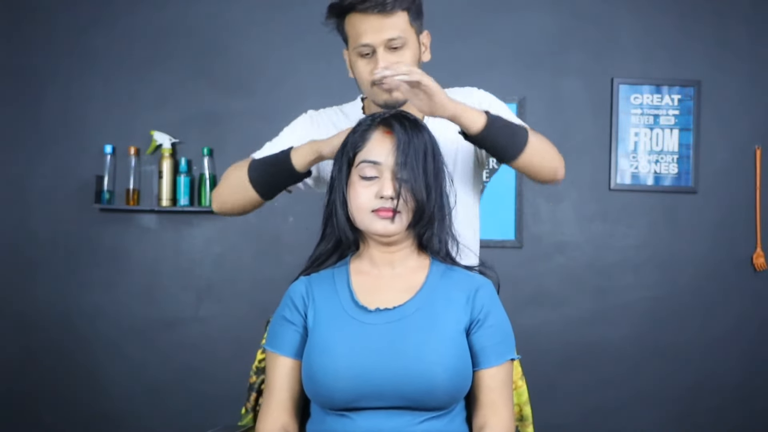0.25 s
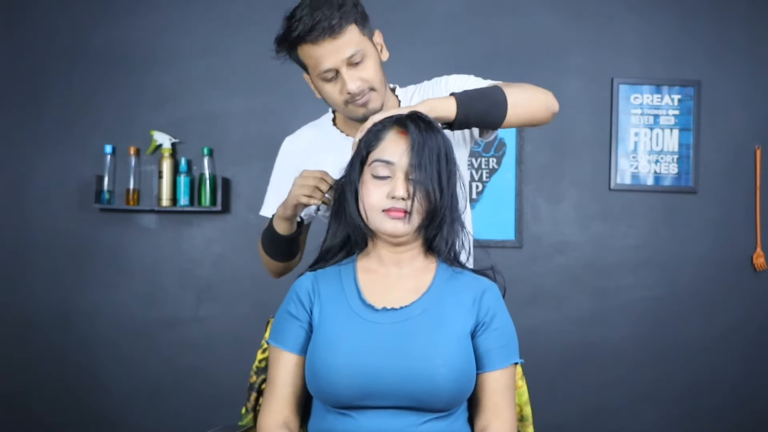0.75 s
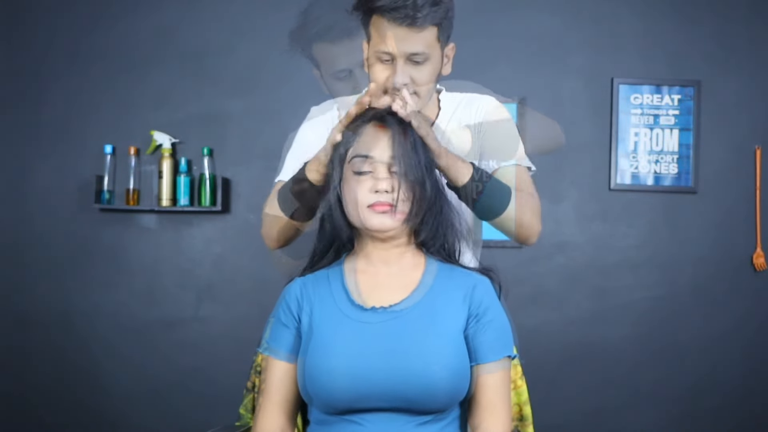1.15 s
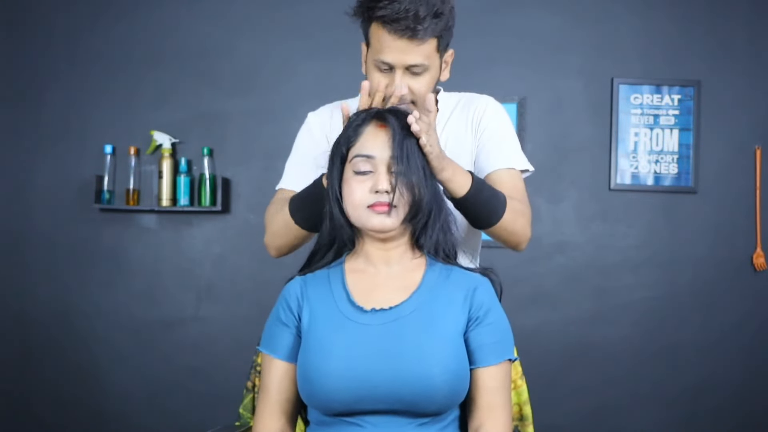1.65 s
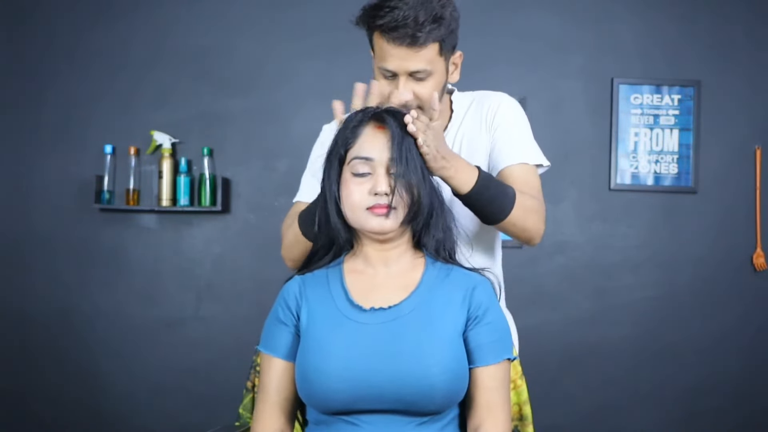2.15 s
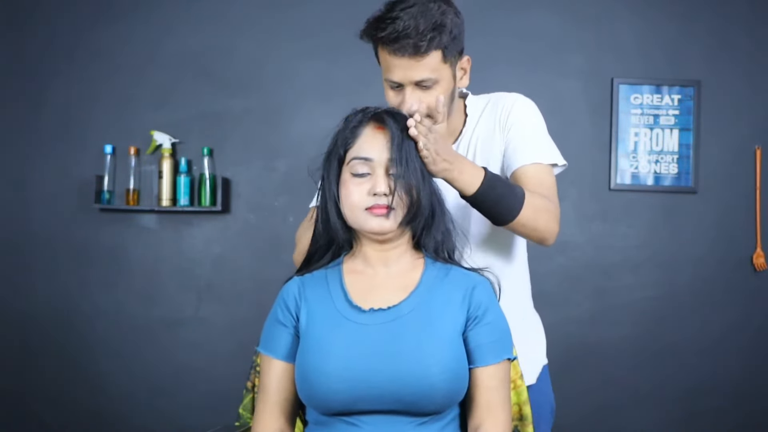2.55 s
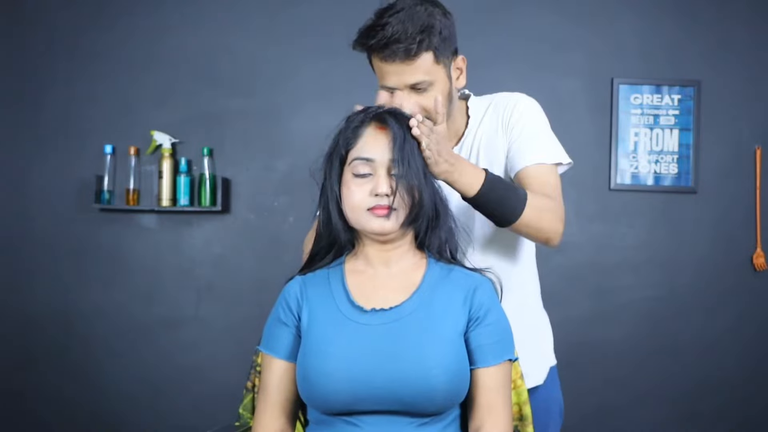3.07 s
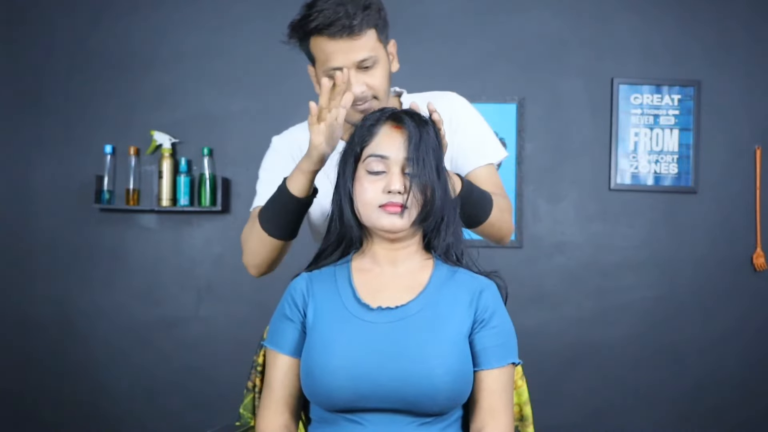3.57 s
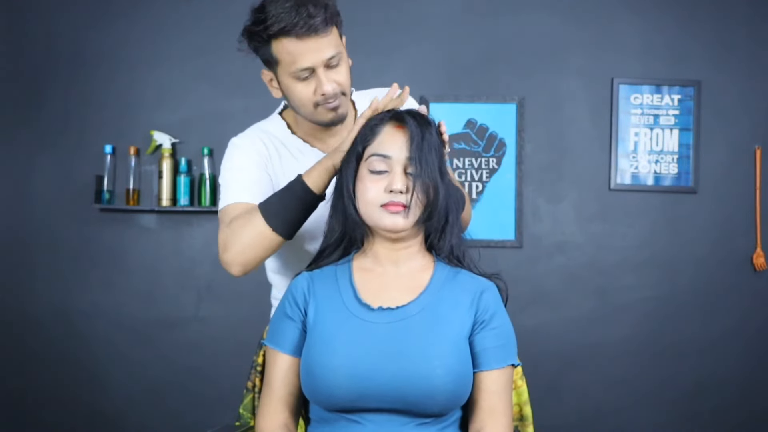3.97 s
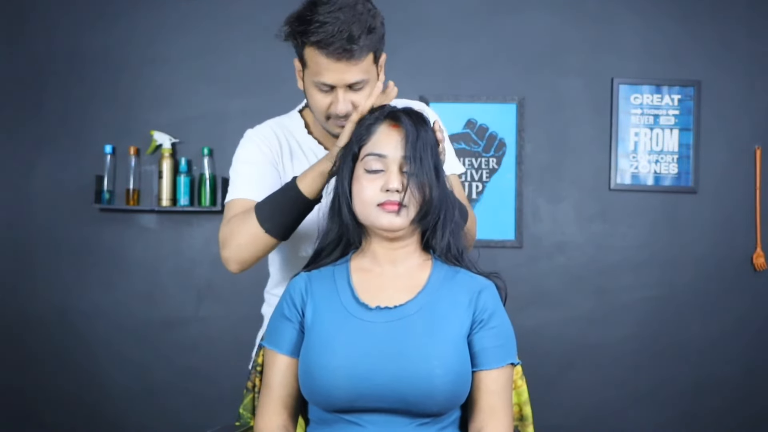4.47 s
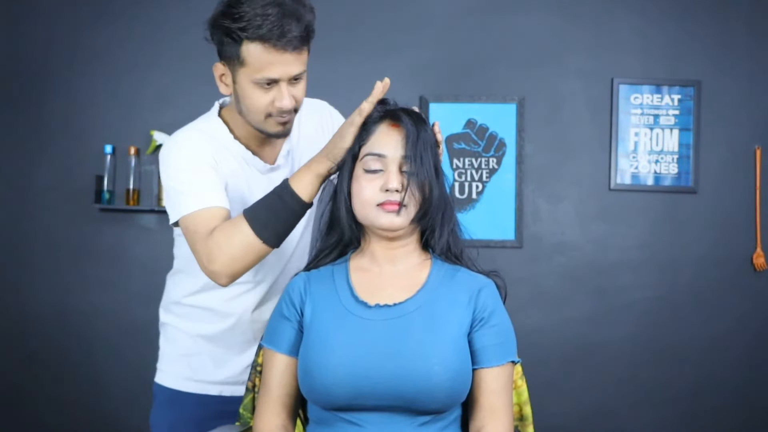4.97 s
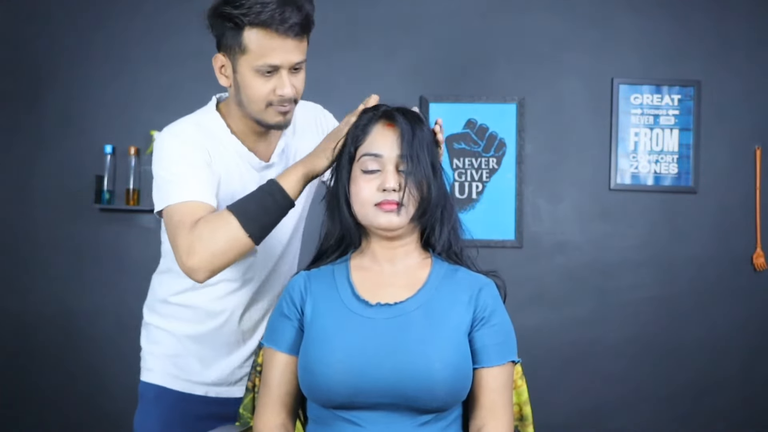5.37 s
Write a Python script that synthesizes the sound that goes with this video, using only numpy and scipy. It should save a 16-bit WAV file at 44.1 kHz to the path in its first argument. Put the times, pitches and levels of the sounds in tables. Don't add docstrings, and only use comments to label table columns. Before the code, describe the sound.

Close in-ear stereo of a hand rubbing long hair and scalp, about nine dry, scratchy strokes a second. It starts soft, shifting between ears, with a knuckle click before one second and a stronger one near 1.5. Rubbing grows louder, dull cable knocks thud around two seconds, then it pauses near 3.6 and resumes to the end. Distant traffic drones in a quiet room.

```python
import sys
import numpy as np
from scipy import signal
from scipy.fft import rfft, irfft, next_fast_len
from scipy.io import wavfile
from scipy.ndimage import uniform_filter1d

SR = 44100
rng = np.random.default_rng(int(sys.argv[2]) if len(sys.argv) > 2 else 0)


def boost(x):
    u = np.asarray(x, float) / 20
    return 10 ** u


def to_wav(s):
    ch = np.atleast_2d(s).T
    pcm = np.round(np.clip(ch, -1, 1) * 32767)
    wavfile.write(sys.argv[1], SR, pcm.astype(np.int16))


N = 247842


def read(points, hz):
    f, value = np.transpose(points)
    return np.interp(np.log(hz + 1), np.log(f + 1), value)[:, None]


def evened(x):
    return x / np.sqrt(np.mean(x ** 2) + 1e-20)


def pair(same, size, snaps_per_s=0.):
    snap_db = 3.5 + 2.5 * np.minimum(rng.exponential(1, (2, N)), 3)
    snaps = (rng.random((2, N)) < snaps_per_s / SR) * boost(snap_db)
    white = rng.standard_normal((2, N))
    grains = white + np.diff(np.sign(white) * snaps, prepend=0)
    hz, t, (a, b) = signal.stft(grains, SR, nperseg=size, noverlap=size * 3 // 4)
    likeness = np.clip(read(same, hz), -1, 1)
    return hz, t, np.array([a, likeness * a + np.sqrt(1 - likeness ** 2) * b])


def sound(z, size):
    return signal.istft(z, SR, nperseg=size, noverlap=size * 3 // 4)[1][:, :N]


def ears(pan_db):
    left = boost(pan_db) ** 2
    return np.sqrt(2 * np.array([left, np.ones_like(left)]) / (1 + left))


def strokes():
    # (time [s], treble left-right [dB], pressure [dB], extra pressure on a push [dB])
    hand = [(.05, -20, -6.5, 0.5), (.13, -29, -4.5, -5.5), (.2, -13, -2, -1), (.66, 61, -5.5, 1.5),
            (1.02, 30, -9.5, -6), (1.2, 1.5, -2, 1.5), (1.56, -4, 0, -2), (1.8, 7.5, -2.5, 3),
            (2.2, 24.5, -4.5, 3), (2.7, 23, -0.5, -1), (3.45, 18, -1.5, 0), (4.0, -2.5, -3, 9.5),
            (4.2, -2, -1.5, 2.5), (5.0, -0.5, 1.5, 4.5), (5.1, 5, -0.5, 3), (5.15, -17, -2.5, 23),
            (5.25, 4, 6.5, -7.5), (5.5, 3, 6, -2)]
    # (start [s], length [s], level [dB])
    pushes = [(.018, 0.07, -39.3), (.667, 0.059, -36), (1.756, 0.074, -27.5), (2.212, 0.056, -30),
              (2.672, 0.061, -30), (2.908, 0.05, -28), (3.365, 0.072, -27.5), (4.067, .075, -31.5),
              (4.526, 0.077, -34), (4.748, 0.077, -35), (4.985, 0.064, -35), (5.070, 0.08, -49)]
    # (start [s], length [s], level [dB])
    jolts = [(.107, 0.063, -38.5), (.159, 0.071, -46.5), (.870, 0.072, -38), (1.073, 0.12, -41.5),
             (1.313, 0.098, -33), (1.539, 0.074, -26), (1.981, .058, -27), (2.434, 0.049, -28.5),
             (3.134, 0.059, -29), (4.294, 0.075, -33.5), (5.321, 0.074, -36.5)]
    # (start [s], length [s], level [dB])
    pulls = [(-.03, 0.063, -51), (.690, 0.11, -56), (.775, 0.071, -37.5), (.980, 0.071, -39),
             (1.210, 0.096, -38), (1.441, 0.078, -31), (1.630, 0.098, -38), (1.862, 0.07, -38.5),
             (2.075, 0.073, -34.5), (2.309, .073, -37), (2.510, 0.1, -41), (2.765, 0.092, -38.5),
             (3.003, 0.074, -36.5), (3.233, 0.076, -34), (3.993, 0.045, -36), (4.185, .076, -33),
             (4.413, 0.073, -35), (4.647, .069, -36), (4.871, 0.076, -36), (5.123, 0.051, -43),
             (5.218, .072, -39), (5.434, 0.069, -40.5)]
    # (start [s], length [s], level [dB], left-right [dB], pressure [dB])
    sleeve = [
        (0.808, 0.15, -66, 16, 25),
        (3.467, 0.041, -55, 21, -1),
        (3.62, .14, -75.5, -6, 17),
        (3.871, 0.062, -56.5, -1, 2),
        (3.941, 0.11, -55, 1, 2),
        (5.33, 0.23, -69, 10, 33.5),
        (5.48, .1, -64, 0, 4),
    ]
    s, *hand_columns = np.transpose(hand)
    brushes = []
    for table, rise, pushing in ((pushes, 0.36, True), (jolts, 0.22, True), (pulls, 0.51, False)):
        for start, length, db in table:
            middle = start + length / 2
            pan_db, pressure_db, extra_db = (np.interp(middle, s, column) for column in hand_columns)
            brushes.append((start, length, db, rise, pan_db, pressure_db + pushing * extra_db))
    for start, length, db, pan_db, pressure_db in sleeve:
        brushes.append((start, length, db, 0.47, pan_db, pressure_db))
    return [(start + rise * length, db, rise * length, (1 - rise) * length, pan_db, pressure_db)
            for start, length, db, rise, pan_db, pressure_db in brushes]


def rubbing():
    # (frequency [Hz], density [dB per Hz])
    hair = [(250, -29), (600, -26.5), (900, -18), (1300, -7), (1800, -5.5), (2400, -1), (3700, 0),
            (5800, -.5), (7800, -3.5), (10500, -6.5), (13500, -12.5), (15500, -19)]
    # (frequency [Hz], share of the pressure [dB per dB])
    fullness = [(600, 2.24), (1300, 1.92), (1800, 1.5), (3200, 1.17), (5800, 0.46), (10500, -0.14),
                (15200, -0.9)]
    # (frequency [Hz], share of left-right [dB per dB])
    shadow = [(600, 0.1), (1300, 0.68), (2400, 0.36), (4300, 0.68), (7800, 0.8), (13500, 1.3)]
    # (frequency [Hz], left-right [dB])
    ear_fit = [(600, -7), (1300, -7), (2400, -5.5), (4300, -5), (7800, 1.1), (13500, -2.5)]
    # (frequency [Hz], likeness [-1 to 1])
    hair_same = [(300, 1), (1200, 0.43), (2500, 0.12), (5000, 0.033), (8000, 0.03)]
    room_db, room_t60 = -19.5, 0.31
    canal_width_hz = 300
    hz, t, z = pair(hair_same, size=256, snaps_per_s=350)
    band = (hz > 2500) & (hz < 14000)
    octaves = np.log2((hz[:, None] + 200) / 4500)
    power = np.zeros(z.shape)
    all_strokes = strokes()
    canals = 2070 * boost(1 * rng.standard_normal((len(all_strokes), 2)))
    for (s, db, rise, fall, pan_db, pressure_db), (peak_hz, next_hz) in zip(all_strokes, canals):
        near = abs(t - s) < .25
        lag = t[near] - s
        away = abs(lag) / np.where(lag < 0, rise, fall)
        speed_db = -10 * (0.33 * away + 0.61 * away ** np.where(lag < 0, 2.8, 3.07))
        colour = boost(read(hair, hz) + read(fullness, hz) * pressure_db)
        colour = colour / np.sqrt(np.sum(colour[band] ** 2) / len(hz))
        lopsided_s = fall - rise
        progress = np.clip(lag / (rise + fall), -.8, .8)
        travel_db = (-1.5 + 250 * lopsided_s) * progress
        sides = ears(read(shadow, hz) * (pan_db + travel_db) + read(ear_fit, hz))
        sweep_db = (1.5 - 210 * lopsided_s) * progress * octaves
        canal_hz = peak_hz + (next_hz - peak_hz) * np.clip(lag / fall, -1, 1)
        far_db = 0.33 * np.clip([-pan_db, pan_db], 0, 15)[:, None, None]
        ring_db = np.clip(3.0 + .5 * pressure_db, -2.5, 4.5) + far_db
        canal_db = ring_db * np.exp(-((hz[:, None] - canal_hz) / canal_width_hz) ** 2)
        power[:, :, near] += (sides * colour * boost(db + speed_db + 0.49 * sweep_db + canal_db)) ** 2
    keep = boost(-120 * (t[1] - t[0]) / room_t60)
    power += boost(room_db) ** 2 * signal.lfilter([1 - keep], [1, -keep], 1.9 * power + 0.067 * power[::-1])
    patches = rng.standard_normal(z.shape)
    tufts = evened(uniform_filter1d(uniform_filter1d(patches, size=4, axis=1), size=30, axis=2))
    jerks = evened(uniform_filter1d(patches.mean(axis=(0, 1)), size=3))
    return sound(z * np.sqrt(power) * boost(2.52 * tufts + 1.24 * jerks - 1.64), size=256)


def room_air():
    # (frequency [Hz], density [dB per Hz])
    air = [(25, -95), (55, -86.5), (100, -80.5), (160, -77.5), (210, -79), (320, -79), (420, -81.5),
           (520, -88.5), (750, -86.5), (1000, -92.5), (1500, -88.5), (2200, -97.5), (4000, -96),
           (8000, -101), (15000, -105)]
    # (frequency [Hz], likeness [-1 to 1])
    air_same = [(60, 1), (180, 0.93), (550, 0.54), (1650, -0.3), (4970, 0.029), (15000, -0.21)]
    # (frequency [Hz], left-right [dB])
    air_pan = [(60, 0.74), (240, -0.41), (950, -2.9), (3770, 0.0), (15000, 0.5)]
    # (time [s], level [dB])
    swell = [(0, 1.5), (1.2, -3), (2.15, 5), (2.6, 3), (3.72, 6.5), (3.9, 4), (5.5, 4.5)]
    hz, t, z = pair(air_same, size=4096)
    shape = boost(read(air, hz))
    shape = boost(-65) * shape / np.sqrt(np.mean(shape ** 2))
    low = np.exp(-np.log((hz[:, None] + 1) / 400) ** 2 / 2.7)
    wash = boost(low * np.interp(t, *np.transpose(swell)))
    return sound(z * shape * wash * ears(read(air_pan, hz)), size=4096)


def drones():
    # (start [s], end [s], first pitch [Hz], last pitch [Hz], level [dB])
    engines = [(-.2, 1.4, 164, 153, -71), (5.25, 5.9, 163, 156, -65), (2.45, 3.1, 228, 246, -69),
               (2.95, 3.75, 245, 240, -65), (3.95, 4.5, 240, 246, -66), (4.5, 5.5, 224, 247, -66),
               (3.3, 4.25, 285, 292, -69), (4.35, 5.0, 274, 291, -68), (5.35, 5.9, 276, 282, -66),
               (-.2, .6, 348, 342, -70), (3.3, 3.85, 345, 348, -70), (4.0, 4.55, 332, 352, -70),
               (4.75, 5.15, 337, 352, -69)]
    fade_s, wander_hz = .12, 1.2
    t = np.arange(N) / SR
    knots = np.linspace(0, N / SR, 60)
    out = np.zeros(N)
    for start, end, first_hz, last_hz, db in engines:
        drift, waver = (np.interp(t, knots, row) for row in rng.standard_normal((2, len(knots))))
        fade = np.clip(np.minimum(t - start, end - t) / fade_s, 0, 1)
        hz = np.interp(t, (start, end), (first_hz, last_hz)) + wander_hz * drift
        out += fade * boost(db + 0.6 + 2.2 * waver) * np.sin(2 * np.pi * np.cumsum(hz) / SR)
    return out * boost([[-.8], [.8]])


def add(mix, s, hz, cycles, gain):
    u = np.arange(-2 * cycles, 3 * cycles, hz / SR)
    bell = np.exp(-(u / np.where(u < 0, 0.43 * cycles, 0.83 * cycles)) ** 2)
    wave = np.cos(2 * np.pi * u)
    start = round((s - 2 * cycles / hz) * SR)
    mix[start:start + len(u)] += gain * bell * (wave - np.sum(bell * wave) / np.sum(bell))


def linger(x, db, t60, channels):
    t = np.arange(SR // 5) / SR
    tail = rng.standard_normal((channels, len(t))) * boost(-60 * t / t60) * np.clip(t / .005, 0, 1)
    return x + boost(db) * signal.oaconvolve(x, tail / np.linalg.norm(tail[0]), axes=1)[:, :N]


def knocks():
    # (time [s], peak level [dB], pitch [Hz])
    thuds = [(.775, -56, 118), (1.932, -43, 121), (1.965, -42, 235), (1.995, -35.5, 107),
             (2.028, -29.5, 227), (2.051, -47, 135), (2.1358, -22.5, 230), (2.163, -41, 130),
             (2.197, -32.5, 160), (2.216, -42, 171), (2.236, -28, 227), (2.284, -46, 100),
             (2.299, -50, 176), (2.472, -52, 92.5), (3.681, -55, 90), (3.705, -50, 188), (3.724, -62, 130),
             (3.774, -57, 142), (4.054, -54, 110), (4.131, -52, 127), (4.460, -44, 131),
             (4.650, -49.5, 110), (4.690, -53, 69.4), (4.895, -57.5, 75), (5.155, -68, 65)]
    rebounds = [(s + 0.01125, db - 5, 118) for s, db, hz in thuds if hz > 180]
    out = np.zeros((2, N))
    for s, db, hz in thuds + rebounds:
        cycles = np.clip(1.75 - 0.0049 * hz * 0.9, .5, 4)
        add(out[0], s + 0.00074, hz * 0.95, cycles, boost(db + 0.1))
        add(out[1], s, hz, cycles, boost(db + 0.5))
    return linger(out, db=-7, t60=0.1, channels=1)


def clicks():
    # (time [s], peak level [dB], pitch [Hz], left-right [dB], left ear later by [s])
    snaps = [
        (0.7960, -21, 1710, -6, 0),
        (0.7962, -34, 860, -7, 0.000029),
        (0.7959, -44, 6000, -9, .0006),
        (1.0095, -65.5, 6900, 32, 0),
        (1.5144, -18.5, 3820, 2, 0.0037),
        (1.5149, -18, 1320, -3, 0),
        (3.738, -56, 700, -3, .0002),
    ]
    out = np.zeros((2, N))
    for s, db, hz, pan_db, later in snaps:
        add(out[0], s + later, hz * 0.99, 1.2, -boost(db + pan_db))
        add(out[1], s, hz * 0.97, 1.15, -boost(db))
    return linger(out, db=-5, t60=0.41, channels=2)


def scene():
    return rubbing() + room_air() + drones() + knocks() + clicks()


def roll_off(x):
    return signal.sosfilt(signal.butter(12, 15870, fs=SR, output="sos"), x)


def record(dry):
    # (frequency [Hz], level [dB])
    ahead = [(100, -5), (300, -4), (700, -7), (1200, -13.5), (4000, -17), (12000, -18.5)]
    ahead_samples = 768
    size = next_fast_len(N + 2 * ahead_samples)
    hz = np.fft.rfftfreq(size, 1 / SR)
    early = boost(read(ahead, hz)[:, 0]) * np.exp(2j * np.pi * hz * ahead_samples / SR)
    band_limit = 1 / (1 + (hz / 15600) ** 200)
    mix = irfft(rfft(dry, size) * (1 + early) * band_limit, size)[:, :N]
    return roll_off(mix)


dry = scene()
out = record(dry)
to_wav(out)
```